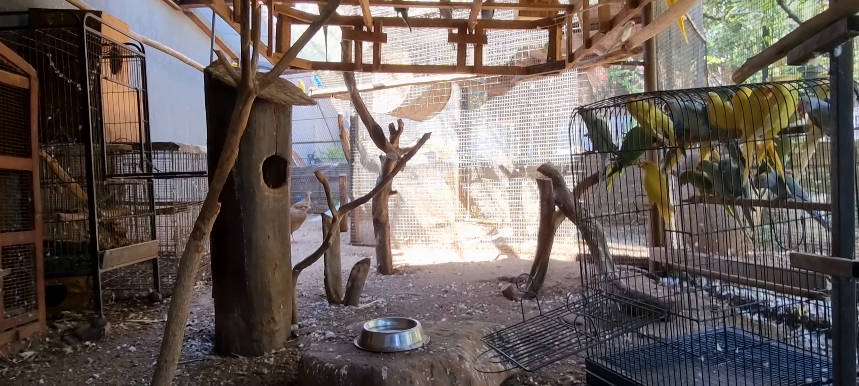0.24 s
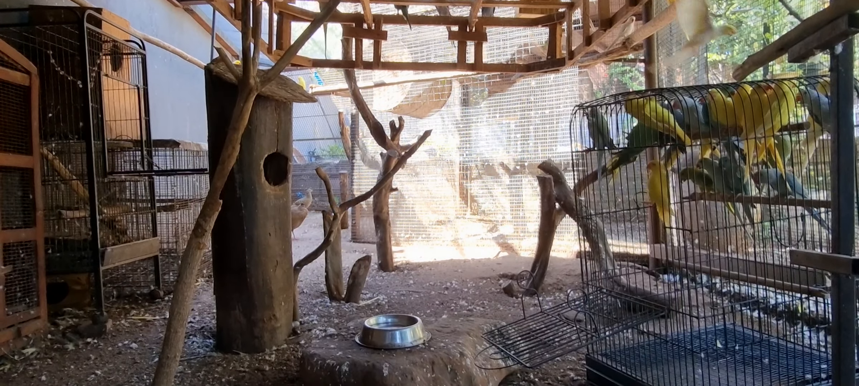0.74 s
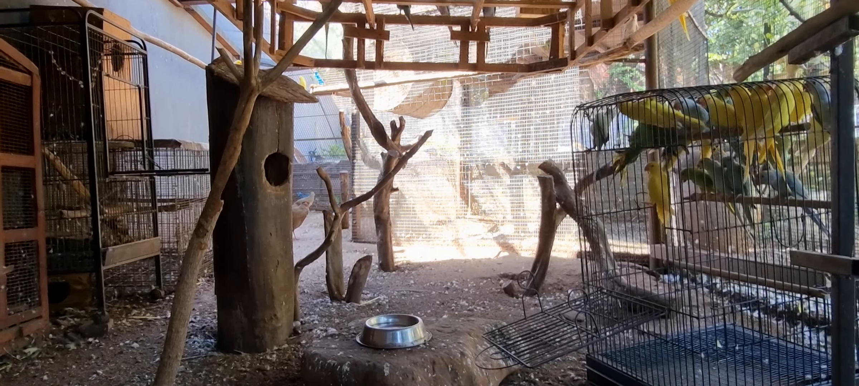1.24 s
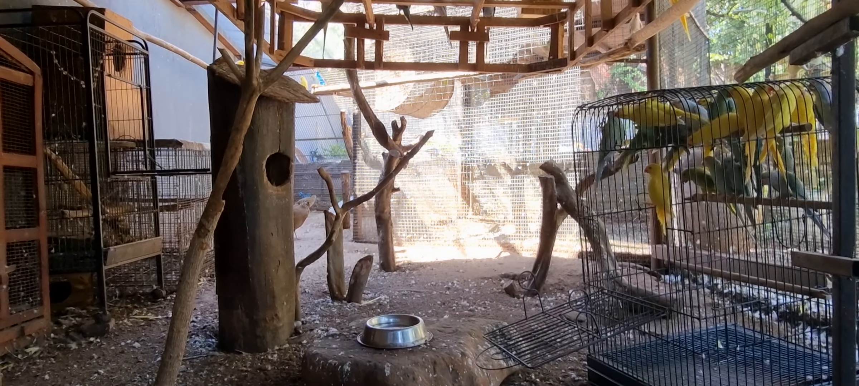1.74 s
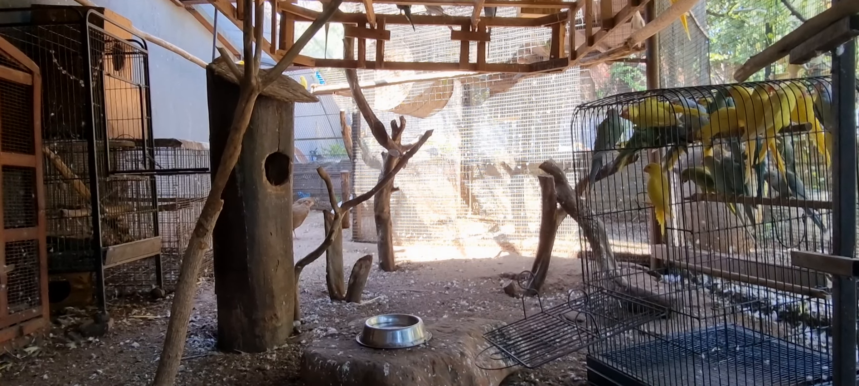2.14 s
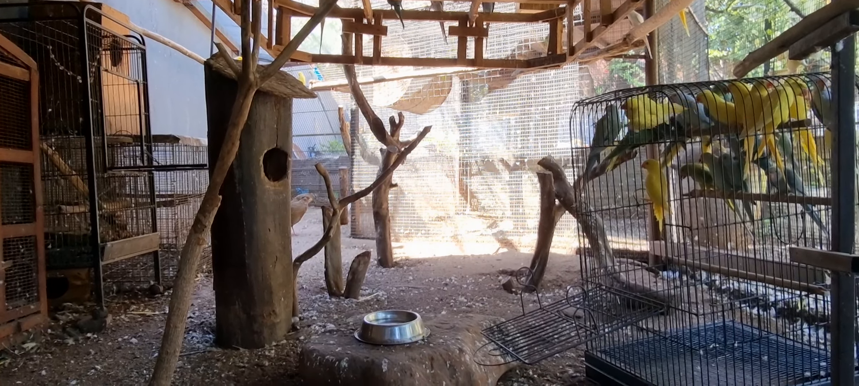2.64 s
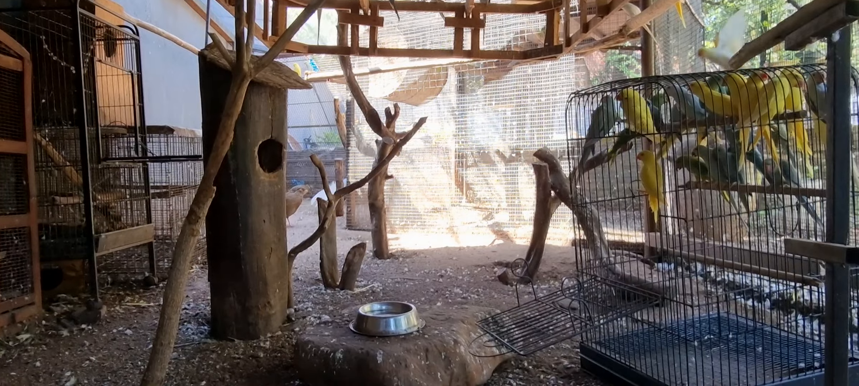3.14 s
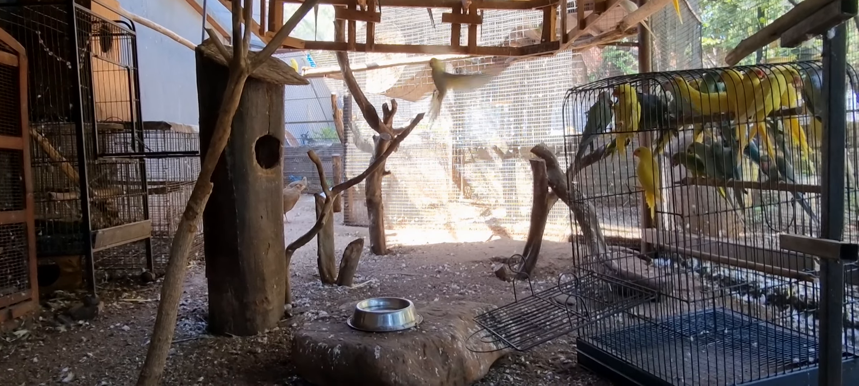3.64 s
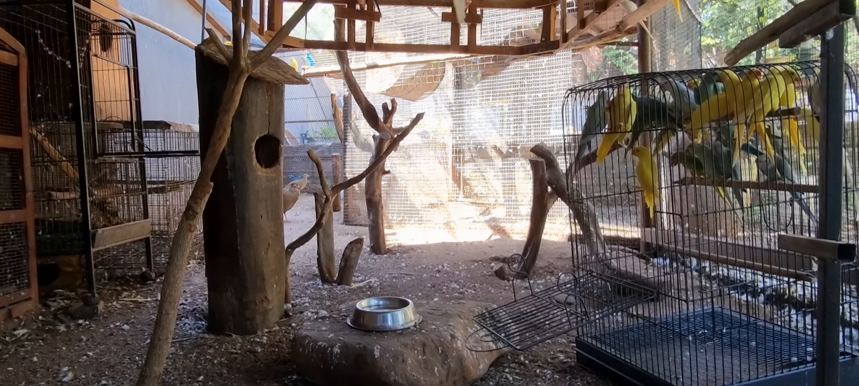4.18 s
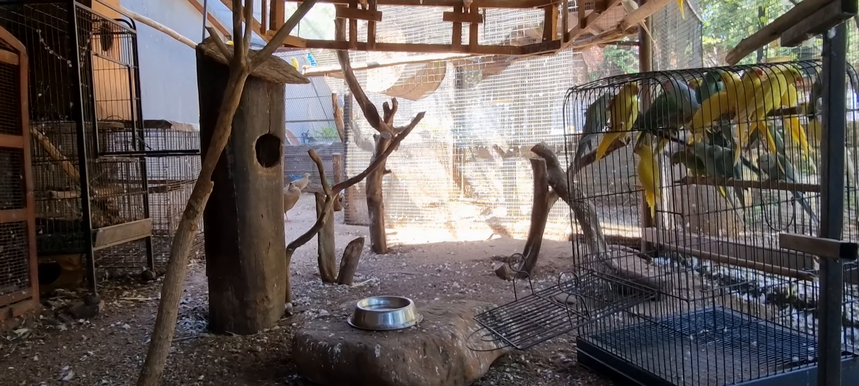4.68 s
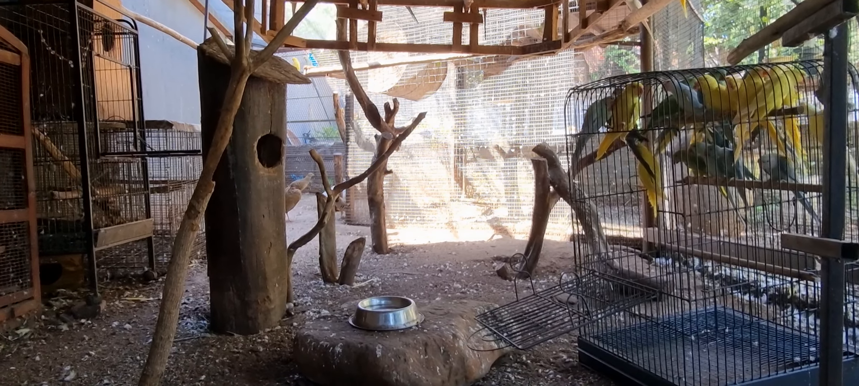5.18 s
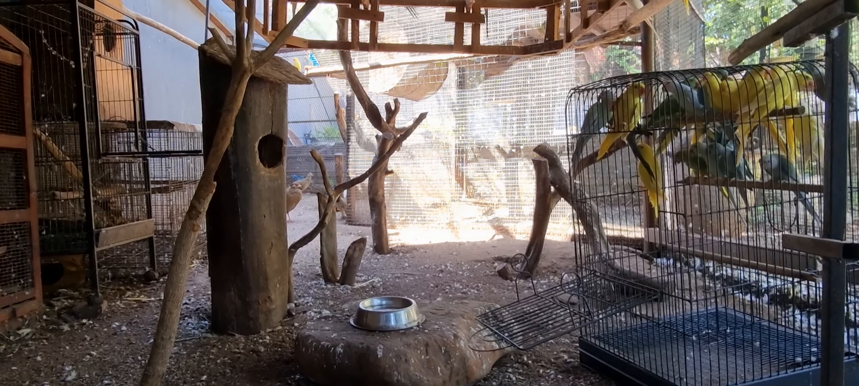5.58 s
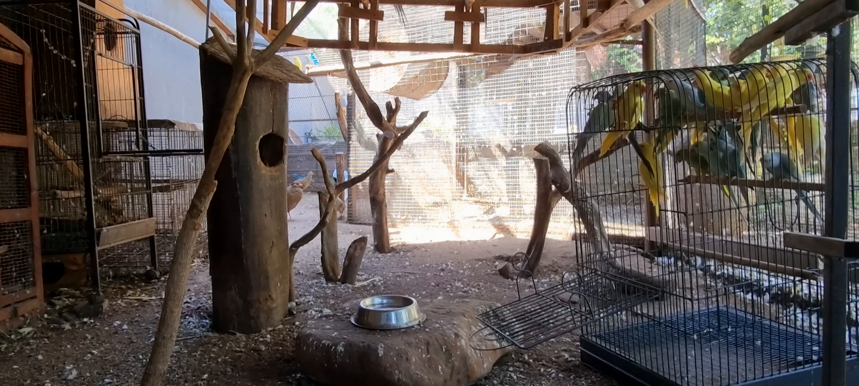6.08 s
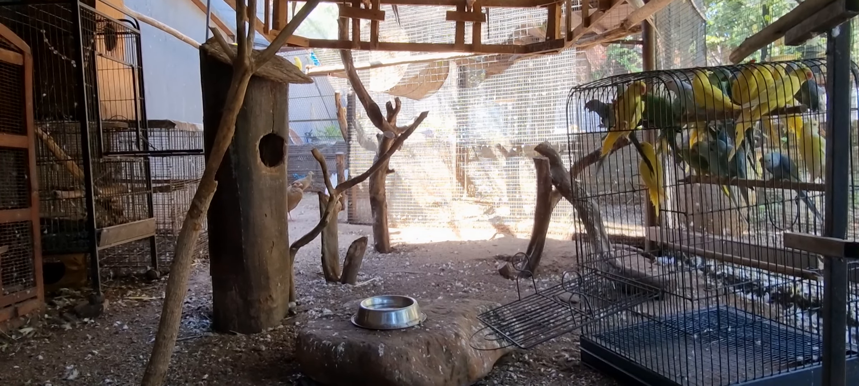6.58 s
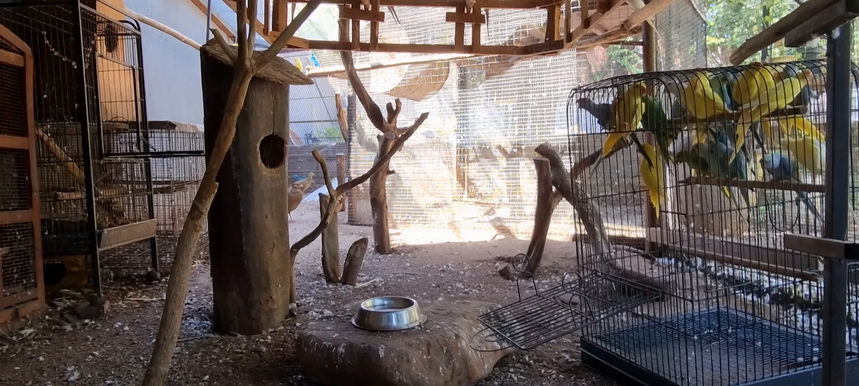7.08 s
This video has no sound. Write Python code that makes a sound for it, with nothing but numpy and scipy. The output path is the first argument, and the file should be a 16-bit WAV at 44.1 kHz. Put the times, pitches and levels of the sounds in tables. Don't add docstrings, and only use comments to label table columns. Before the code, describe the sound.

A close, shrill aviary of parakeets, nearly nonstop. A piercing whistle around 3.7 kHz and flock rasping open at 0 s, followed by arched cries and a chirp. From 0.7 to 2.4 s short whistles repeat rapidly, each with a quick rough rise and a raspy fall, over bursts of harsh chorus. Around 2.7-3.5 s come low chirps, a strong low arch, high cries and a scream, with creaky parrot squawks; a deep handling thump lands at 3.24 and a knock at 3.48. Whistles return at 3.6, 3.9 and 4.35, with husky grumbles; a long scream fills 4.95-5.3. Swooping cries and spaced whistles run from 5.2 to 6.4, then falling screams, thinning before a steep chirp at 7.0 and a loud flock burst at 7.3. A dove coos very faintly beneath. Birds are bright and slightly clipped on the right, muffled on the left with wind rumble; short dry reverberation.

```python
import sys
import numpy as np
from scipy import signal
from scipy.fft import rfft, irfft
from scipy.io import wavfile
from scipy.ndimage import uniform_filter1d

SR = 44100
rng = np.random.default_rng(int(sys.argv[2]) if len(sys.argv) > 2 else 0)


def ratio_of_db(decibels):
    return 10 ** (np.asarray(decibels, float) / 20)


def dump(signal):
    limited = np.clip(np.atleast_2d(signal).T, -1, 1)
    pcm = np.round(limited * 32767).astype(np.int16)
    wavfile.write(sys.argv[1], SR, pcm)


N = 322812
SECONDS = np.arange(N) / SR

# whistle_start_s, whistle_length_s, whistle_pitch_hz, whistle_level_db, rise_level_db
CONTACTS = [(.716, 0.07, 3670, -11, -26.5), (0.873, 0.058, 3793, -10.5, -23),
            (1.023, 0.062, 3647, -11.5, -29.5), (1.163, 0.077, 3667, -11, -22),
            (1.468, 0.056, 3555, -10.5, -40), (1.622, 0.062, 3638, -11, -32.5),
            (2.047, 0.064, 3487, -12.5, -28.5), (2.166, 0.065, 3570, -10, -26),
            (2.316, 0.085, 3413, -13, -32), (2.643, 0.032, 3280, -24, -60), (3.566, .07, 3520, -11, -21),
            (3.91, .073, 3575, -10, -20.5), (4.348, 0.065, 3524, -9.5, -22), (5.232, 0.072, 3450, -17, -46),
            (5.64, 0.064, 3540, -13, -49), (6.022, 0.075, 3430, -13.5, -28),
            (6.349, 0.077, 3510, -12.5, -45)]
RISE_PITCH = (0.35, 0.46, .67)
WHISTLE_PITCH = (.94, .89)
FALL_PITCH = (.66, .53, .4)

# start_s, end_s, top_pitch_hz, last_pitch_hz, level_db
ARCHES = [
    (.125, .235, 1960, 1392, -22.5),
    (.365, .5, 2430, 1395, -21.5),
    (2.29, 2.41, 2200, 1670, -26),
    (3.015, 3.17, 2740, 1600, -24.5),
    (5.75, 5.87, 2434, 1460, -24),
    (7.245, 7.36, 2250, 1670, -29.5),
]
SCREAMS = [
    (3.255, 3.45, 2680, 1600, -25),
    (4.95, 5.3, 2230, 1400, -26.5),
    (6.5, 6.88, 1270, 980, -40),
    (6.3, 6.49, 3100, 1300, -31),
    (4.6, 4.8, 1750, 1400, -34.5),
    (6.495, 6.65, 1850, 760, -29.5),
]
SWOOPS = [
    (5.455, 5.62, 2410, 1282, -24),
    (5.995, 6.165, 2496, 1617, -24.5),
]
LOW_ARCHES = [
    (2.905, 3.07, 1680, 700, -20.5),
    (6.02, 6.245, 1260, 690, -25),
    (5.84, 5.99, 1400, 630, -29),
]

# start_s, end_s, first_pitch_hz, last_pitch_hz, level_db
STRAY_RISES = [
    (6.288, 6.352, 2150, 2450, -23),
    (1.446, 1.468, 1400, 5400, -26),
    (1.608, 1.63, 1100, 2380, -23),
]
STRAY_FALLS = [
    (2.675, 2.745, 2200, 1450, -28.5),
    (.04, .12, 2047, 1340, -23),
    (1.815, 1.87, 2080, 1700, -23.5),
    (3.36, 3.46, 1920, 1640, -28),
    (3.86, 3.872, 930, 1600, -40),
]
STRAY_WHISTLES = [
    (0.0, .085, 3860, 3640, -12),
]
CHIRPS = [
    (.305, .362, 1135, 1134, -24),
    (2.76, 2.93, 1180, 1186, -27.5),
    (4.78, 4.85, 1143, 1120, -34),
    (5.86, 5.98, 1224, 1100, -30),
    (7.034, 7.22, 2058, 1193, -23.5),
]
FAR_CHIRPS = [(.13, .22, 1218, 1040, -36), (1.16, 1.25, 1297, 1224, -26.5), (2.96, 3.17, 1090, 910, -28),
              (3.43, 3.52, 900, 1265, -21.5), (3.52, 3.65, 1023, 1073, -18.5),
              (4.12, 4.17, 1037, 1033, -19), (4.66, 4.75, 1042, 1045, -26), (4.585, 4.67, 950, 1138, -28),
              (5.77, 5.84, 1026, 965, -26), (5.93, 5.99, 1170, 970, -32.5), (6.86, 6.92, 1081, 898, -30.5)]
LOW_NOTES = [
    (.46, .62, 760, 593, -46),
    (.96, 1.06, 744, 774, -40),
    (2.41, 2.7, 1390, 1398, -31.5),
    (5.07, 5.13, 373, 364, -42.5),
    (5.07, 5.13, 744, 720, -33),
    (5.16, 5.38, 515, 520, -45.5),
    (5.17, 5.39, 1030, 1036, -32),
    (5.35, 5.46, 780, 950, -41.5),
    (6.89, 6.935, 3510, 3030, -30.5),
]
GRUMBLES = [
    (4.19, 4.32, 1270, 1310, -23),
    (4.76, 5.0, 1100, 1500, -28),
    (3.2, 3.38, 1400, 1300, -26.5),
    (6.58, 6.72, 1600, 1250, -55),
    (3.97, 4.06, 1900, 1500, -31),
    (0.62, 1.1, 1100, 1100, -38.5),
    (1.72, 2.1, 2400, 850, -38),
    (3.66, 3.74, 2500, 1280, -30),
]

# slope_db (per overtone), second_overtone_db
WHISTLE_DB = (-2.5, -4.6)
FALL_TONE_DB = (-0.07, 6)
RISE_DB = (-0.3, 5.5)
ARCH_DB = (-1, 8)
SCREAM_DB = (-2, 5)
SWOOP_DB = (-0.5, 7.5)
CHIRP_DB = (-3, 3.5)
FAR_CHIRP_DB = (-9.5, 11)
# turn_share (of length), bend_in_power, bend_out_power, jitter_share, rasp_share, edge_share,
# slope_db (per overtone), second_overtone_db
WHISTLE = (.45, 3.0, 4.0, .0035, .28, .12, *WHISTLE_DB)
FALL = (.5, 1.0, 1.0, .017, .5, .15, *FALL_TONE_DB)
RISE = (.5, 1.0, 1.0, .035, .7, .2, *RISE_DB)
ARCH = (.36, 2.0, 1.7, .02, .5, .22, *ARCH_DB)
SCREAM = (.34, 2.0, 1.7, .036, .65, .2, *SCREAM_DB)
SWOOP = (.26, 2.0, 1.4, .015, .45, .3, *SWOOP_DB)
LOW_ARCH = (.38, 2.0, 1.5, .01, .35, .25, -6.0, 4)
CHIRP = (.36, 2.4, 1.0, .012, .4, .12, *CHIRP_DB)
FAR_CHIRP = (.36, 1.0, 1.0, .01, .4, .3, *FAR_CHIRP_DB)
LOW = (.4, 2.0, 2.0, .004, .2, .4, -17.0, -12)
GRUMBLE = (.4, 1.0, 1.0, .03, .6, .3, -12.0, -3)
# frequency_hz, gain_db
THROAT = [(300, -44), (1200, -19.5), (2300, -9.5), (3500, -0.5), (5000, -3.5), (7200, -2), (10500, -11.5),
          (14500, -11), (18000, -30)]

CHORUS_HZ = [582, 1192, 1460, 1743, 2003]
# centre_hz, width_hz, gain_db
FLOCK_BANDS = [(2680, 590, 10), (3520, 1200, 7), (4240, 90, -6), (4900, 100, 8), (5605, 190, 8),
               (6270, 1100, 3), (7720, 660, 0.5), (9140, 1240, 4), (12770, 2800, 9.5)]
# start_s, end_s, level_db, brightness_db
OUTBURSTS = [(0.0, 0.206, -17, 7.5), (0.42, 0.632, -24, 5.5), (0.619, 0.92, -19, -1), (.96, 1.33, -30, 12),
             (1.393, 1.615, -24, -5), (1.678, 1.917, -14.5, 7.5), (1.921, 2.457, -21.5, 6.5),
             (2.574, 2.74, -26.5, -7), (2.766, 2.95, -16, -2), (2.99, 3.2, -18.5, 1.5),
             (3.255, 3.43, -14.5, 3), (3.485, 3.725, -20.5, 5), (4.11, 4.31, -24, 1),
             (4.548, 4.683, -26, 2.5), (4.678, 4.868, -15.5, -3.5), (4.914, 5.33, -14.5, 1.5),
             (5.568, 5.69, -16.5, 0), (5.68, 5.9, -20.5, 5), (5.985, 6.11, -15.5, -4),
             (6.282, 6.497, -21.5, 18.5), (6.53, 6.766, -29, 3), (6.9, 7.07, -36.5, -4),
             (7.307, 7.4, -6, -0.5)]
# start_s, end_s, level_db
SQUAWKS = [(0.0, .17, -36), (0.312, 0.942, -40.5), (1.277, 1.486, -41.5), (1.596, 2.06, -41),
           (2.15, 2.37, -41.5), (2.713, 3.027, -40), (3.155, 3.384, -26.5), (3.434, 3.72, -25),
           (3.79, 4.1, -33.5), (4.1, 4.354, -27.5), (4.584, 5.0, -26.5), (4.995, 5.344, -34.5),
           (5.6, 5.85, -37), (5.967, 6.278, -35), (6.456, 6.84, -33), (6.98, 7.4, -41.5)]
# centre_hz, width_hz, level_db
SQUAWK_BEAK = [(704, 120, -25), (1060, 310, -16), (1305, 660, 3.5), (1882, 290, 3.5), (2112, 144, 5),
               (4060, 4700, 6), (5180, 360, -6.5)]
# start_s, end_s, level_db
COOS = [
    (.68, 1.0, -58),
    (1.64, 1.95, -51),
    (2.98, 4.0, -53),
    (4.0, 4.66, -55),
    (6.95, 7.32, -57),
]
# frequency_hz, density_db (per Hz)
AIR = [(100, -27), (200, -11.5), (500, -3), (850, -3), (3370, -73), (7710, -46), (10800, -37), (15800, -40)]
# time_s, level_db
WIND = [(0, -47.5), (2.6, -49), (2.702, -40.5), (2.85, -42.5), (2.95, -38.5), (3.1, -45.5), (3.45, -46),
        (3.52, -42), (3.65, -48.5), (4.3, -46), (4.45, -50.5), (7.0, -48.5), (7.32, -41.5)]
# start_s, pitch_hz, t60_s, peak_db
BUMPS = [
    (3.24, 66, 0.11, -7),
    (3.469, 64, 0.38, -21),
    (3.485, 280, 0.0046, -7),
]


def colour(points, hz):
    p = np.array(points, float)
    return ratio_of_db(np.interp(np.log(hz), np.log(p[:, 0]), p[:, 1]))


def level(x, db):
    return x * ratio_of_db(db) / np.sqrt(np.mean(x ** 2) + 1e-18)


def shaped(x, gain):
    hz = np.maximum(np.fft.rfftfreq(len(x), 1 / SR), 1)
    return irfft(rfft(x) * gain(hz), len(x))


def walk(size, rate):
    k = int(SR / rate)
    smooth = uniform_filter1d(rng.standard_normal(size), k)
    return level(uniform_filter1d(smooth, k), 0)


def syrinx(hz, jitter, rasp, slope_db, second_db):
    n = len(hz)
    turns = 2 * np.pi * np.cumsum(hz * (1 + jitter * walk(n, rate=600))) / SR
    flutter = walk(n, rate=1500)
    out = np.zeros(n)
    for k in range(1, int(16000 / hz.min()) + 1):
        own_flutter = np.roll(flutter, 997 * k)
        gain = ratio_of_db(slope_db * k + second_db * (k == 2)) * colour(THROAT, k * hz)
        out += gain * (1 + rasp * own_flutter) * np.sin(k * turns + k * k)
    return level(out * np.exp(rasp * walk(n, rate=240) / 2), 0)


def calls(table, voice):
    turn, bend_in, bend_out, jitter, rasp, edge, slope_db, second_db = voice
    out = np.zeros(N + SR)
    for t0, t1, first, top, last, db in table:
        u = np.linspace(0, 1, int((t1 - t0) * SR))
        coming = (first - top) * abs(1 - u / turn) ** bend_in
        going = (last - top) * abs((u - turn) / (1 - turn)) ** bend_out
        hz = top + np.where(u < turn, coming, going)
        breath = np.clip(np.minimum(2 * u, 1 - u) / edge, 0, 1)
        i = int(max(t0, 0) * SR)
        out[i:i + len(u)] += ratio_of_db(db) * breath * syrinx(hz, jitter, rasp, slope_db, second_db)
    return out[:N]


def contact_parts():
    rise_s, fall_s = .028, .067
    rises, whistles, falls = [], [], []
    for start, length, hz, db, rise_db in CONTACTS:
        end = start + length
        if start > rise_s:
            rises.append((start - rise_s, start, *np.multiply(RISE_PITCH, hz), rise_db))
        whistles.append((start, end, WHISTLE_PITCH[0] * hz, hz, WHISTLE_PITCH[1] * hz, db))
        fall_db = -8.5 + 1.26 * db
        falls.append((end, end + fall_s, *np.multiply(FALL_PITCH, hz), fall_db))
    return rises, whistles, falls


def arched(table, onset):
    return [(t0, t1, onset * top, top, last, db) for t0, t1, top, last, db in table]


def glided(table, mid):
    return [(t0, t1, first, first + mid * (last - first), last, db) for t0, t1, first, last, db in table]


def near_birds():
    rises, whistles, falls = contact_parts()
    loud = ((falls + glided(STRAY_FALLS, .3), FALL),
            (rises + glided(STRAY_RISES, .3), RISE),
            (arched(ARCHES, .64), ARCH),
            (arched(SCREAMS, .7), SCREAM),
            (arched(SWOOPS, .6), SWOOP))
    clear = ((whistles + glided(STRAY_WHISTLES, .8), WHISTLE),
             (arched(LOW_ARCHES, .72), LOW_ARCH),
             (glided(CHIRPS, .8), CHIRP),
             (glided(FAR_CHIRPS, .45), FAR_CHIRP),
             (glided(LOW_NOTES, .2614), LOW),
             (glided(GRUMBLES, .2614), GRUMBLE))
    return ratio_of_db(10.0) * sum(calls(*kind) for kind in loud) + sum(calls(*kind) for kind in clear)


def swell(t0, t1, db, attack, release):
    edges = np.minimum((SECONDS - t0) / attack + .5, (t1 - SECONDS) / release + .5)
    return ratio_of_db(db) * np.clip(edges, 0, 1)


def chorus(db, bright_db):
    birds = 0
    for hz in CHORUS_HZ:
        turn = ratio_of_db(3.5 * walk(N, rate=10))
        pitch = hz * (1 + .05 * walk(N, rate=6))
        birds = birds + turn * syrinx(pitch, .018, .5, -1.3 * hz / 1500, 0)

    def windpipes(hz):
        return 0.2 + sum(ratio_of_db(gain_db) / (1 + (2 * (hz - centre) / width) ** 2)
                         for centre, width, gain_db in FLOCK_BANDS)

    birds = shaped(birds, windpipes)
    top = shaped(birds, lambda hz: 1 / (1 + (5500 / hz) ** 4))
    return ratio_of_db(db) * (level(birds, 0) + (ratio_of_db(bright_db) - 1) * top / birds.std())


def far_flock():
    bouts = [swell(*row[:3], attack=.016, release=.08) for row in OUTBURSTS]
    flock = ratio_of_db(-34.5) + sum(bouts)
    bright_db = sum(bout * row[3] for bout, row in zip(bouts, OUTBURSTS)) / flock
    return flock * chorus(-6.0, bright_db)


def squawk(db):
    phase = np.cumsum(89.2 * (1 + .12 * walk(N, rate=60))) / SR % 1
    puffs = (np.diff(phase, prepend=0) < 0) * ratio_of_db(3.0 * walk(N, rate=150))
    puffs = puffs + .09 * np.exp(-phase / .3) * rng.standard_normal(N)
    rings = 0
    for hz, width, ring_db in SQUAWK_BEAK:
        b, a = signal.iirpeak(hz, hz / width, SR)
        ring = signal.lfilter(b, a, signal.lfilter(b, a, puffs))
        rings = rings + ratio_of_db(ring_db) * level(ring, 0)
    return ratio_of_db(db) * level(rings, 0)


def big_parrot():
    effort = ratio_of_db(-54.5) + sum(swell(*row, attack=.12, release=.041) for row in SQUAWKS)
    return effort * squawk(0.17)


def dove():
    gate = 0
    for t0, t1, db in COOS:
        gate = gate + ratio_of_db(db) * np.clip(np.minimum(SECONDS - t0, t1 - SECONDS) / 0.0083, 0, 1)
    throb = 1 + .7 * np.sin(2 * np.pi * 19 * SECONDS + 3 * walk(N, rate=5))
    husk = ratio_of_db(2.5 + 1.5 * walk(N, rate=8) + 3.0 * walk(N, rate=50))
    turns = np.cumsum(288 * (1 + .07 * walk(N, rate=40))) / SR
    return gate * throb * husk * np.sin(2 * np.pi * turns)


def aviary(x, t60, wet_db):
    t = SECONDS[:SR // 2]
    decay = np.exp(-np.log(1000) * t / t60)
    tail = rng.standard_normal(len(t)) * decay * np.clip(t / .003 - 1, 0, 1)
    tail = shaped(tail, lambda hz: 1 / (1 + (hz / 7000) ** 2))
    tail = tail / np.sqrt(np.sum(tail ** 2))
    return x + ratio_of_db(wet_db) * signal.fftconvolve(x, tail)[:N]


def bumps():
    out = np.zeros(N)
    for t0, hz, t60, peak_db in BUMPS:
        t = np.maximum(SECONDS - t0, 0)
        decay = np.exp(-np.log(1000) * t / t60)
        out -= ratio_of_db(peak_db) * np.sin(2 * np.pi * hz * t) * decay * np.minimum(t * hz * 3.3, 1)
    return out


def wind(db):
    def spectrum(hz):
        return (50 / hz) ** 0.53 / (1 + (10 / hz) ** 2) / np.sqrt(1 + (hz / 78) ** 9)

    s, gust_db = np.transpose(WIND)
    deep = shaped(rng.standard_normal(N), spectrum)
    return level(deep, db) * ratio_of_db(np.interp(SECONDS, s, gust_db) + 1.2 * walk(N, rate=2.5))


def air():
    return level(shaped(rng.standard_normal(N), lambda hz: colour(AIR, hz)), -57)


def scene():
    near = aviary(near_birds(), t60=.18, wet_db=-8.5)
    far = aviary(far_flock() + big_parrot() + dove(), t60=.12, wet_db=-3.0)
    return np.array([wind(7.5) + bumps(), near + far + air() + wind(-10.5)])


def roll_off(x):
    return signal.sosfilt(signal.butter(12, 15990, fs=SR, output="sos"), x)


def record(dry):
    right = dry[1] / (1 + abs(dry[1] / .96) ** 6) ** (1 / 6)
    leak = signal.lfilter(*signal.butter(1, 1000, fs=SR), right)
    hiss = level(rng.standard_normal(N), -96)
    left = dry[0] - ratio_of_db(-6.5) * leak + hiss
    band_limit = signal.ellip(10, .2, 70, 15970, fs=SR, output="sos")
    both = signal.sosfilt(band_limit, np.array([left, right]))
    return roll_off(both)


dry = scene()
out = record(dry)
dump(out)
```